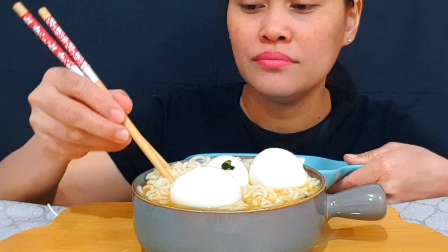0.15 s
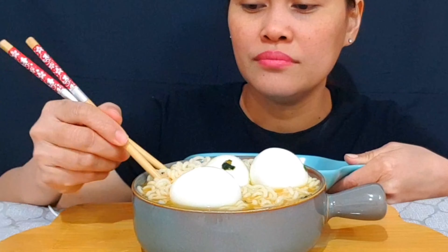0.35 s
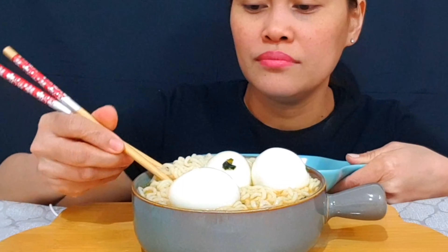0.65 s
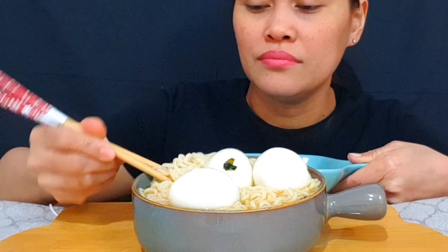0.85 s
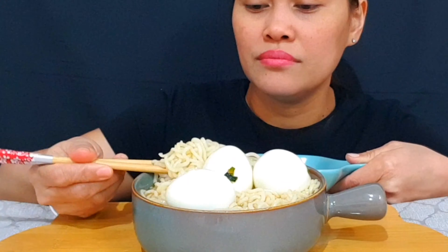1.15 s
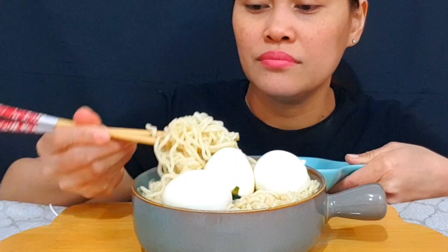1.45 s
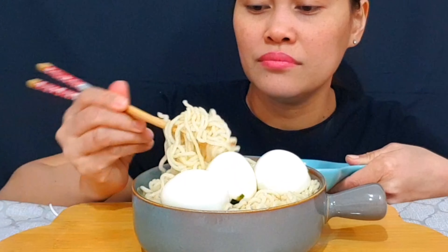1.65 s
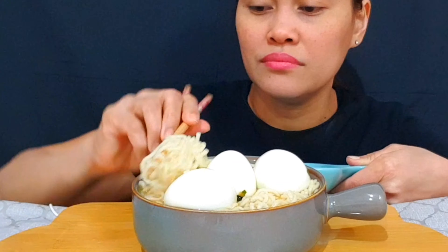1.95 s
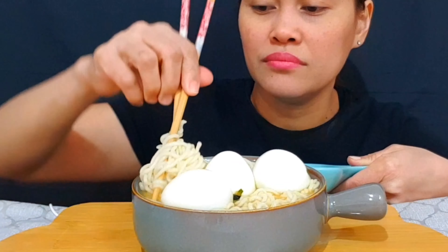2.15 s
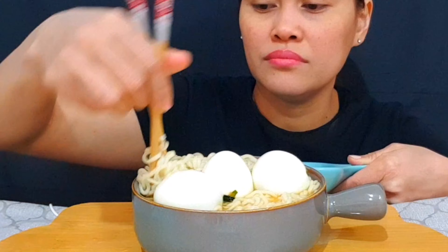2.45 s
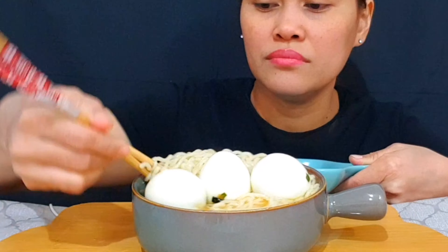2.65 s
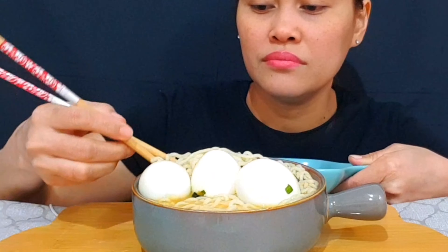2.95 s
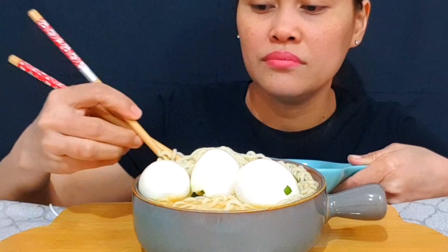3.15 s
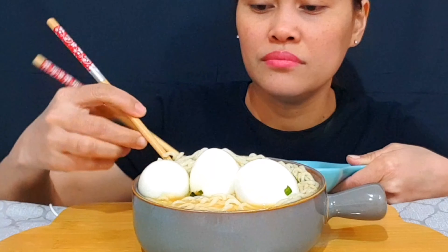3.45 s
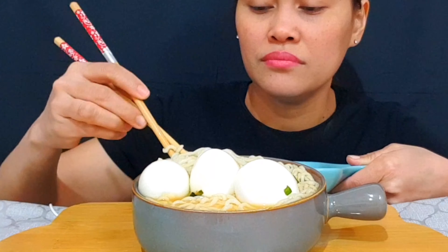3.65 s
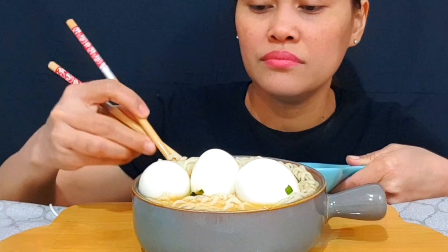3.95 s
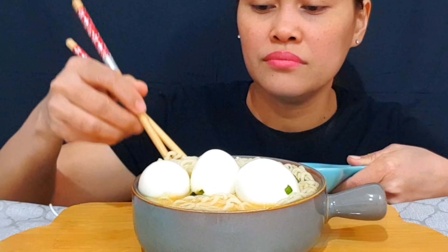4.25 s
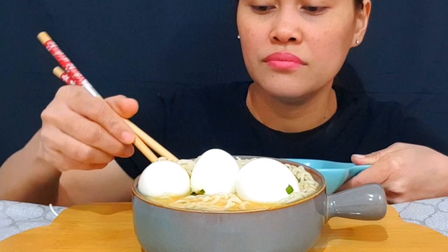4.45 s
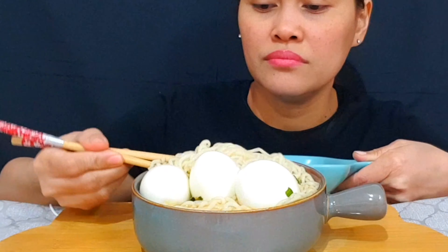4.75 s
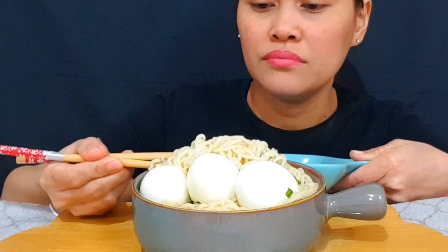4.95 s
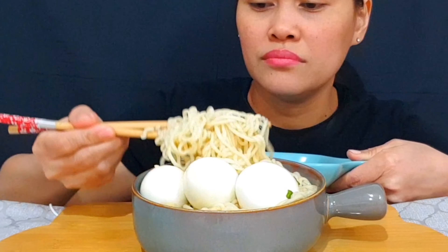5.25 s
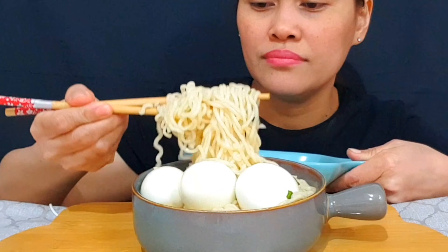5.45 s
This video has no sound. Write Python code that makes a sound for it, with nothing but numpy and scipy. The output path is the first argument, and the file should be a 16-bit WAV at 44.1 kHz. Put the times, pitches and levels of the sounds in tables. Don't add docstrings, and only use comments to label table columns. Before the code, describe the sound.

Chopsticks nudge a heavy ceramic pot of noodles with soft low thumps, scrapes and tiny wooden ticks, then two sharp ringing clinks.

```python
import sys
import numpy as np
from scipy import signal
from scipy.fft import rfft, irfft
from scipy.io import wavfile
from scipy.ndimage import uniform_filter1d

SR = 44100
rng = np.random.default_rng(int(sys.argv[2]) if len(sys.argv) > 2 else 0)


def to_linear_factor(level_db):
    exponent = np.asarray(level_db, float) / 20
    return 10 ** exponent


def master(y):
    cut = np.clip(np.atleast_2d(y).T, -1, 1)
    pcm = np.round(cut * 32767)
    wavfile.write(sys.argv[1], SR, pcm.astype(np.int16))


N = 246750
T = np.arange(N) / SR

# (time [s], push [dB], contact [ms], ring [dB], change of the earlier ring [dB])
FIRST_CLINK = [
    (4.5489, 3.5, 0.34, -15.5, 0),
    (4.5868, -12.5, .75, -22.5, -9),
]
SECOND_CLINK = [
    (5.1343, -4.5, 0.36, -20, 0),
    (5.1843, -8, 0.54, -32.5, -29),
    (5.2233, -27.5, 1, -44.5, -37),
    (5.2625, -27, 1.2, -37.5, -23),
    (5.2775, -42, 1.6, -42, 0),
    (5.2905, -42, 1.28, -54, -7),
]


def rms_one(x):
    return x / np.sqrt(np.mean(x ** 2) + 1e-20)


def low_pass(x, hz):
    return signal.sosfilt(signal.butter(4, min(hz, 20000), fs=SR, output="sos"), x)


def coloured(spectrum):
    top_hz = 15700
    hz, db = np.transpose(spectrum)
    bin_hz = np.fft.rfftfreq(N, 1 / SR) + 1e-3
    gain = to_linear_factor(np.interp(np.log(bin_hz), np.log(hz), db)) * (bin_hz < top_hz)
    return rms_one(irfft(rfft(rng.standard_normal(N)) * gain, N))


def flicker(hz):
    return rms_one(signal.sosfilt(signal.butter(2, hz, fs=SR, output="sos"), rng.standard_normal(N)))


def resonance(x, hz, width_hz):
    r = np.exp(-np.pi * width_hz / SR)
    poles = [1, -2 * r * np.cos(2 * np.pi * hz / SR), r * r]
    return signal.lfilter(np.array([1, 0, -1]) * (1 - r * r) / 2, poles, x)


def add(out, s, x):
    i = round(s * SR)
    out[i:i + len(x)] += x[:N - i]


def rings(t, hz, t60_s, db):
    return to_linear_factor(np.c_[db] - 60 * t / np.c_[t60_s]) * np.sin(2 * np.pi * np.c_[hz] * t)


def ducking():
    depth_db, rise_s, back_s = 3.5, 0.043, 0.95
    since_s = np.maximum(T - np.array([[FIRST_CLINK[0][0]], [SECOND_CLINK[0][0]]]), 0)
    dip = (1 - np.exp(-since_s / rise_s)) * np.exp(-since_s / back_s)
    return to_linear_factor(-depth_db * dip.max(axis=0))


def room_hum():
    # (frequency [Hz], density [dB per Hz])
    hum_spectrum = [(12, -44.5), (20, -18.5), (27, -17.5), (45, -3.5), (113, -6), (132, -1), (146, -14),
                    (315, -28), (659, -39), (1200, -47.5), (1560, -61.5), (2640, -120)]
    return to_linear_factor(-57 + 1.5 * flicker(5) + 0.65 * flicker(2.5)) * coloured(hum_spectrum)


def shared_hiss():
    # (frequency [Hz], density [dB per Hz])
    hiss_spectrum = [(180, -28), (300, 0), (565, -16), (656, -14), (787, -10.5), (1610, -11.5),
                     (2280, -13.5), (4520, -14), (9390, -9), (15000, -15.5), (16000, -13.5)]
    return to_linear_factor(-68) * coloured(hiss_spectrum)


def channel_hiss():
    # (frequency [Hz], density [dB per Hz])
    own_spectrum = [(18, -27), (30, -6), (239, -9), (426, -11.5), (822, -10), (937, -11), (2060, -11),
                    (2680, -9), (9970, -9), (14800, -10.5), (16000, -11.5)]
    return to_linear_factor(-68.5) * coloured(own_spectrum)


def stroke(s, length_s, start_db, end_db):
    grip_s, let_go_s = 0.007, 0.03
    end_s = s + length_s
    return np.interp(T, [s - 3 * grip_s, s, end_s, end_s + 3 * let_go_s],
                     [start_db - 90, start_db, end_db, end_db - 91])


def effort():
    # (start [s], length [s], effort at start [dB], effort at end [dB], contact with the glaze [dB])
    pot_shoves = [
        (0.193, 0.031, -39.5, -35.5, -0.5),
        (0.497, 0.12, -61, -37, -6),
        (0.609, 0.2, -48, -35, -6),
        (1.9, 0.19, -42.5, -45, -2),
        (2.522, 0.063, -51.5, -58, 2),
        (2.604, 0.031, -51.5, -49, -11),
        (2.64, .15, -39.5, -41.5, -2.5),
        (3.217, 0.083, -60.5, -51, -3),
        (4.298, 0.11, -59, -37, -3.5),
        (4.41, 0.12, -31.5, -28, -1),
    ]
    # (time [s], length [s], effort [dB])
    board_nudges = [(0.101, 0.031, -60), (0.305, 0.05, -73), (1.268, 0.044, -53.5), (2.25, 0.023, -56),
                    (2.883, 0.043, -56.5), (3.714, 0.017, -55), (3.894, .1, -57.5), (4.172, 0.032, -43.5),
                    (4.867, 0.022, -67), (5.098, .03, -90), (5.319, 0.015, -69), (5.418, .015, -70.5),
                    (2.096, 0.018, -61.5)]
    shoves = np.array([stroke(*row[:4]) for row in pot_shoves])
    nudges = np.max([stroke(s, length_s, db, db) for s, length_s, db in board_nudges], axis=0)
    glaze_db = (shoves + np.array(pot_shoves)[:, 4:]).max(axis=0)
    return np.maximum(shoves.max(axis=0), nudges), glaze_db


def table_sway(board_db):
    # (frequency [Hz], density [dB per Hz])
    sway_spectrum = [(30, -31), (60, -9), (85, -7.5), (130, 0.5), (200, -18), (400, -50.5)]
    return uniform_filter1d(to_linear_factor(board_db - 10), size=SR // 30) * coloured(sway_spectrum)


def drag(board_db):
    # (frequency [Hz], width [Hz], level [dB])
    table_modes = [(88.5, 21, -3), (144, 29, 3.5), (196, 44.7, 5.5), (267.8, 90.7, 0), (355.3, 42, 0.5),
                   (487.3, 97, -16), (580, 420, -22), (869, 270, -24.5)]
    rest_db, rest_wander_db, slips_per_s = -73.5, 3.5, 450
    force = to_linear_factor(board_db) + ducking() * to_linear_factor(rest_db + rest_wander_db * flicker(1.7))
    slips = (rng.random(N) < slips_per_s / SR) * rng.standard_normal(N) * to_linear_factor(2.0 * flicker(25))
    shake = np.zeros(N)
    for k, (hz, width_hz, db) in enumerate(table_modes):
        shake += (-1) ** k * to_linear_factor(db) * resonance(slips, hz, width_hz)
    return low_pass(to_linear_factor(-3.0) * force * rms_one(shake), 1170)


def slide(glaze_db):
    # (frequency [Hz], density [dB per Hz])
    rub_spectrum = [(300, -9.5), (550, 4), (1000, -6.5), (2500, -4), (5000, -11.5), (6500, -25),
                    (15000, -39.5)]
    # (frequency [Hz], density [dB per Hz])
    glaze_spectrum = [(1200, -15), (2500, -2), (4500, 0), (6000, -0.5), (8000, 3.5), (10000, -13),
                      (11500, -17.5), (15000, -29.5)]
    over_db = glaze_db + 43
    rub = to_linear_factor(-77.5 + 2 * over_db) + ducking() * to_linear_factor(-81)
    rustle = to_linear_factor(-72 + 0.94 * over_db) + ducking() * to_linear_factor(-75.5)
    scrape = rub * to_linear_factor(3.5 * flicker(45)) * coloured(rub_spectrum)
    wet = rustle * to_linear_factor(2.2 * flicker(90)) * coloured(glaze_spectrum)
    return scrape + 1.5 * resonance(scrape, 1000, 90) + wet


def thumps():
    # (time [s], peak [dB], frequency [Hz], t60 [s])
    knocks = [(0.599, -34, 160, 0.2), (0.688, -36.5, 196, 0.12), (0.784, -18, 198, 0.04),
              (0.806, -33.5, 187, 0.036), (1.268, -33, 61.9, 0.025), (1.899, -42, 186, 0.18),
              (1.971, -28, 88, 0.18), (2.028, -34.5, 85, 0.14), (2.247, -34.5, 92.5, 0.079),
              (2.533, -39, 121, 0.038), (2.654, -45, 192, 0.025), (2.784, -36, 177, 0.1),
              (3.258, -43.5, 191, 0.091), (3.703, -35.5, 73.6, 0.12), (3.817, -43.5, 89, 0.21),
              (4.162, -42.5, 124, 0.1), (4.36, -31, 146, 0.066), (4.411, -54, 204, 0.049)]
    out, t = np.zeros(N), T[:SR // 5]
    for s, db, hz, t60_s in knocks:
        decay = to_linear_factor(db - 2.5 - 60 * t / max(t60_s, 0.01))
        add(out, s, decay * np.sin(2 * np.pi * hz * t) * np.minimum(4 * hz * t, 1))
    return out


def snaps():
    # (time [s], peak [dB], centre [Hz], length [ms])
    wet_bursts = [(0.193, -50, 4360, 1.1), (0.2184, -39, 7500, 2), (0.222, -49, 7300, 4.2),
                  (0.622, -50.5, 2720, 0.69), (0.7821, -31.5, 4700, 0.99), (0.7853, -39, 2450, 5.1),
                  (0.8064, -37, 4160, 2.3), (1.5694, -51.5, 3560, 0.97), (1.9014, -49, 7910, 1.4),
                  (2.0256, -48.5, 4900, 1.7), (2.149, -51.5, 5730, 1.7), (2.6467, -35, 2750, 0.59),
                  (2.7556, -47, 7240, 1), (2.7866, -46, 7320, 2.1), (3.259, -48.5, 8780, 1.6),
                  (3.3846, -51.5, 8100, 4.0), (4.4486, -24, 3470, 0.9), (4.5174, -60, 2550, 1.4)]
    out, t = np.zeros(N), T[:SR // 25]
    for s, db, hz, ms in wet_bursts:
        noise = rng.standard_normal(len(t))
        burst = noise * np.exp(-t * 1000 / max(ms, 0.3))
        burst = resonance(burst, 2800, 7000) + 1.2 * resonance(burst, hz, 0.35 * hz)
        burst = burst - 0.8 * resonance(burst, 6100, 1800)
        add(out, s, to_linear_factor(db) * burst / np.abs(burst).max())
    return low_pass(out, 12500) + 0.25 * out


def ticks():
    # (frequency [Hz], t60 [s])
    stick_modes = [(1192, 0.17), (1895, 0.08), (3380, 0.066), (4900, 0.016), (7030, 0.064)]
    # (time [s], levels of the four lower modes [dB] x 4)
    loose_ticks = [
        (0.305, -57, -64, -66, -58),
        (0.317, -67, -66, -76, -76),
        (3.4198, -85, -51, -56, -50),
        (3.4427, -78, -61, -64, -55),
        (2.787, -63.5, -82, -78, -78),
        (4.3427, -70, -59, -66, -73),
        (4.4099, -43, -52, -41, -53),
    ]
    # (time [s], level [dB], mode frequencies [Hz] x 3)
    gripped_taps = [(0.109, -59, 674, 1190, 1830), (0.109, -65, 1870, 2600, 2730),
                    (0.3056, -59.5, 1010, 1760, 2540), (0.529, -65, 1180, 1750, 1940),
                    (0.745, -61.5, 1390, 1750, 2400), (3.4164, -57.5, 1310, 1570, 2470),
                    (3.543, -61, 1350, 2340, 3120), (3.5435, -59.5, 6400, 4200, 4880),
                    (4.3167, -54.5, 1310, 2020, 2800), (4.321, -55.5, 1510, 2520, 3480),
                    (.51, -64, 1030, 1150, 1890), (.96, -69.5, 1190, 1360, 2170)]
    tap_t60_s, top_mode_db = 0.051, -4
    out, t = np.zeros(N), T[:SR // 8]
    hz, t60_s = np.transpose(stick_modes)
    for s, *db in loose_ticks:
        add(out, s, rings(t, hz, t60_s, [*db, db[2] + top_mode_db]).sum(axis=0))
    for s, db, *tap_hz in gripped_taps:
        skid = rng.standard_normal(len(t)) * np.exp(-t / 0.01)
        scuff = 1.7 * low_pass(resonance(skid, np.mean(tap_hz), 2300), 2.6 * max(tap_hz))
        add(out, s, to_linear_factor(db) * (rings(t, tap_hz, [tap_t60_s], [0]).sum(axis=0) + scuff))
    return out


def grazes():
    # (time [s], push [dB], contact [ms], ring [dB], change of the earlier ring [dB], only negative
    soft_touches = [
        (0.1918, -32, 2.2, -60, 4),
        (0.2245, -38, 1.65, -71, 11),
        (0.3062, -65, 1.2, -59.5, 0),
        (2.7862, -66, 1.8, -51.5, 10),
        (2.803, -72, 1.1, -83, -9),
        (4.165, -64, 1.9, -84, 0),
        (5.5, -58, 0.47, -69, 0),
        (5.585, -75, 0.37, -64, -1),
    ]
    return clink(soft_touches, spot=0, board_db=5)


def clink(blows, spot, board_db):
    wall_hz = [954, 1044, 1097, 1230, 1912, 2524, 2862, 3617, 4398, 4520, 4870, 5430, 6745, 7300, 7865,
               7900, 8400, 8840, 9150, 10000, 10645, 11330, 12430]
    # (t60 [s], level at the first spot [dB], level at the second spot [dB])
    wall_modes = [(0.55, -6.5, -5), (0.4, -5, -43), (1, -34, 0), (0.033, -14, -1), (0.089, -20, -21),
                  (0.17, -1.5, 2), (0.077, -11.5, -10), (0.062, -3.5, 4), (0.018, -13.5, 5.5),
                  (0.0088, 10.5, -5), (0.036, -18, -2), (0.027, -19, -8), (0.09, -27.5, -9.5),
                  (.085, -15.5, 0.5), (.06, -26, -11.5), (0.0017, -3.5, -20), (.05, -29, -15),
                  (0.035, -23.5, -9), (0.053, -35, -11.5), (0.057, -29.5, -39), (0.1, -19, -3),
                  (0.064, -33.5, -8), (.035, -34.5, -12.5)]
    tilt_db, tilt_db_per_ms = -0.23, -2
    settle_s = 0.097
    hold_db_per_s = 43
    hz, (t60_s, *spot_db) = np.array(wall_hz), np.transpose(wall_modes)
    khz = hz / 1000
    sign = np.where(hz < 1000, -1, 1)
    push, ring, t = np.zeros(N), np.zeros(N), T[:SR // 3]
    for s, push_db, ms, ring_db, _ in blows:
        noise = rng.standard_normal(len(t))
        contact = np.clip(t * 1000 / ms, 0, 1)
        soft_db = (tilt_db + tilt_db_per_ms * ms) * np.log2(khz) - 10 * np.log10(1 + (hz * ms / 3700) ** 4)
        lost_db = np.zeros(len(t))
        for later_s, _, _, _, change_db in blows:
            if later_s > s:
                lost_db += min(change_db, 0) * np.clip((t + s - later_s) / 0.0017, 0, 1)
        touch_db = lost_db * np.c_[khz ** 0.45]
        hold_db = hold_db_per_s * ms ** 2 * t * np.c_[khz]
        damped = to_linear_factor(touch_db - 10 * (t / settle_s) ** 2 - hold_db)
        modes = damped * rings(t, hz, t60_s, ring_db + spot_db[spot] + soft_db)
        add(ring, s, contact * (sign @ modes))
        add(push, s, to_linear_factor(push_db) * low_pass(np.sin(np.pi * contact) ** 0.61, 3000 / ms))
        scatter = to_linear_factor(-29 - 60 * t / 0.05) + to_linear_factor(-38 - 60 * t / 0.4)
        echo = low_pass(np.diff(noise, prepend=0) + 0.4 * noise, 4000 / ms)
        add(ring, s, contact * to_linear_factor(ring_db) * scatter * echo)
    undershoot = 0.73 * resonance(np.roll(push, round(0.00083 * SR)), 150, 360)
    rebound = signal.lfilter(*signal.butter(1, 110, "high", fs=SR), push) - undershoot
    return rebound + ring + to_linear_factor(board_db) * resonance(push, 175, 130)


def scene():
    board_db, glaze_db = effort()
    snap = snaps()
    near = drag(board_db) + slide(glaze_db) + thumps() + snap + ticks() + grazes()
    blows = clink(FIRST_CLINK, spot=0, board_db=0.5) + clink(SECOND_CLINK, spot=1, board_db=5.0)
    background = room_hum() + table_sway(board_db) + shared_hiss()
    difference = channel_hiss() + to_linear_factor(-18.0) * np.diff(snap, prepend=0)
    difference += to_linear_factor(-35.5) * resonance(blows, 1100, 900)
    return near + ducking() * (background + blows + difference * [[1], [-1]])


def roll_off(x):
    return signal.sosfilt(signal.butter(12, 16800, fs=SR, output="sos"), x)


def record(dry):
    rounded = low_pass(1.043 * np.tanh(dry / 1.047), 16500)
    return roll_off(rounded)


dry = scene()
out = record(dry)
master(out)
```